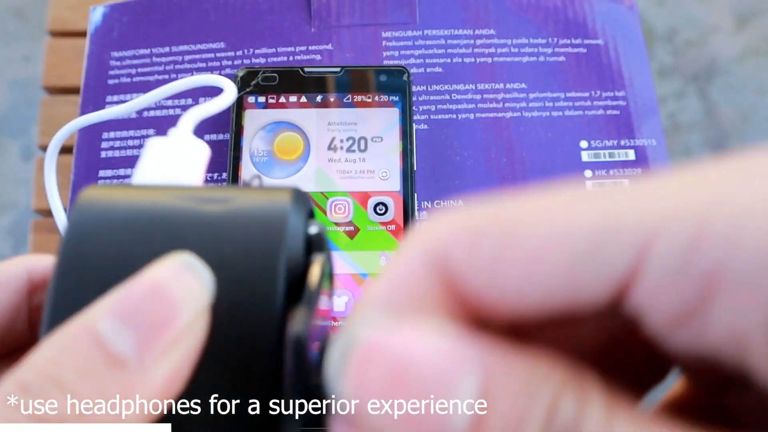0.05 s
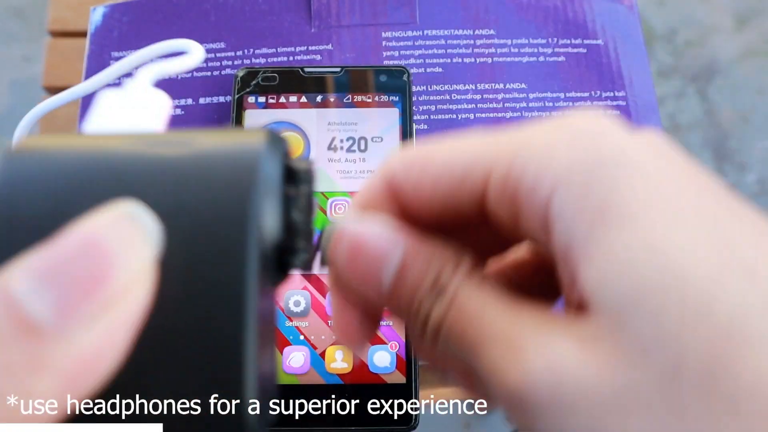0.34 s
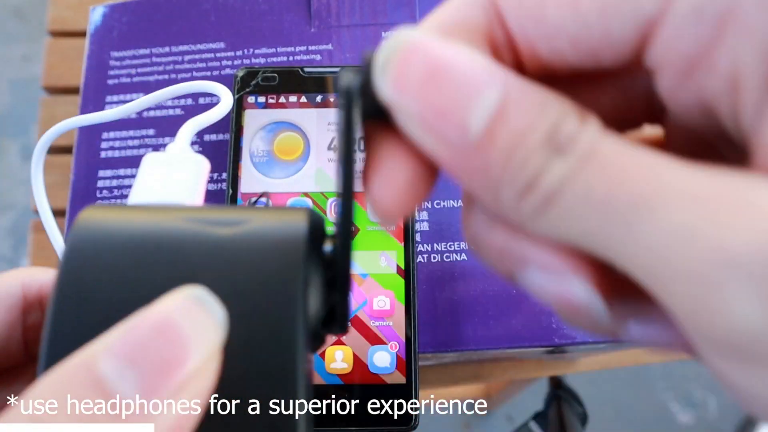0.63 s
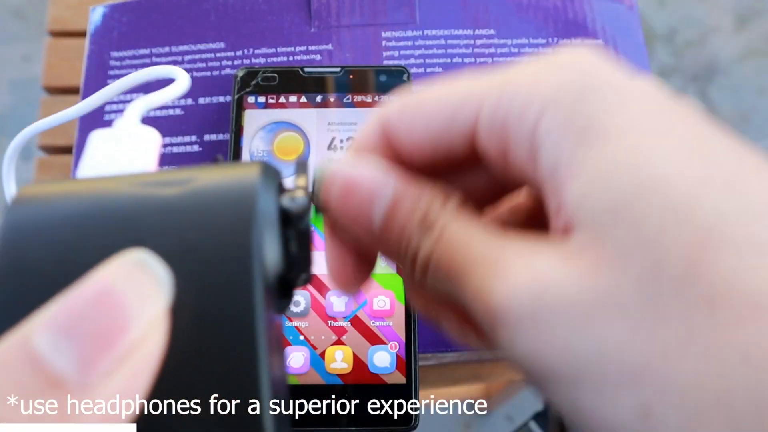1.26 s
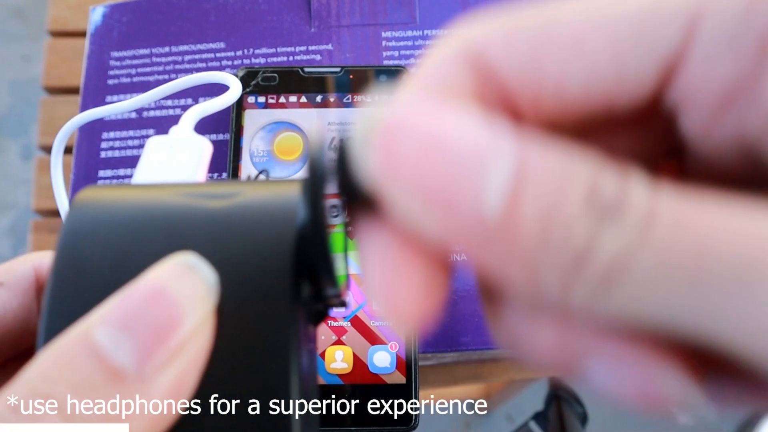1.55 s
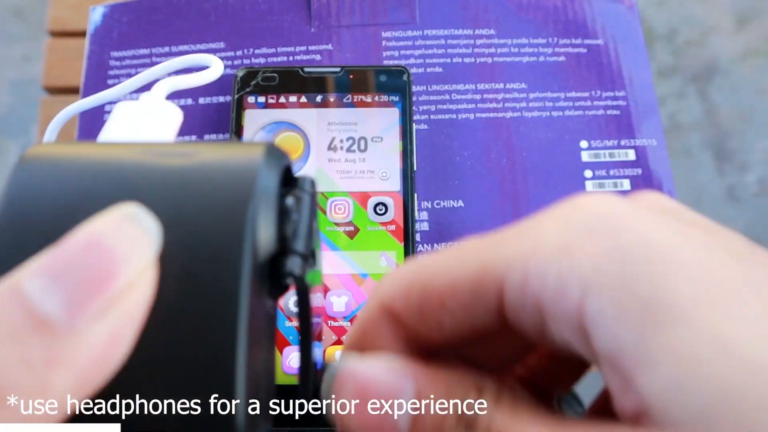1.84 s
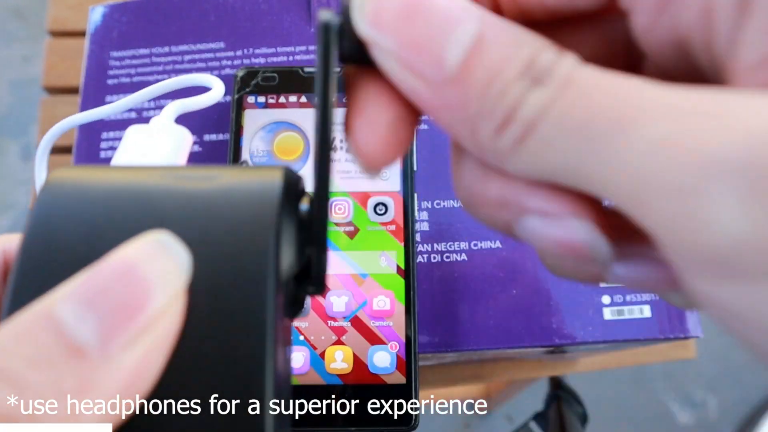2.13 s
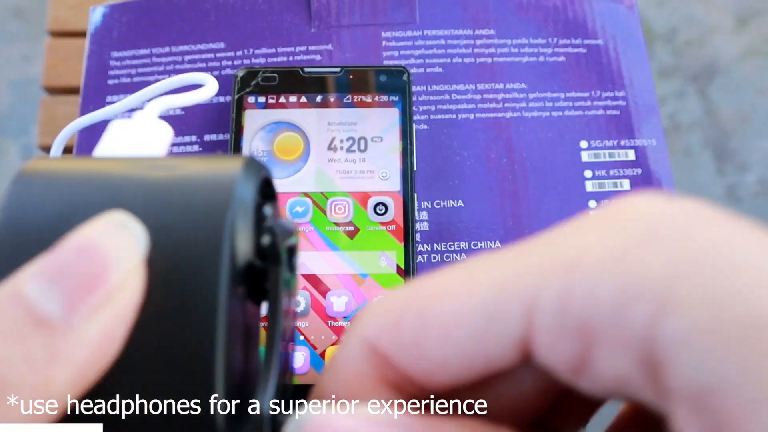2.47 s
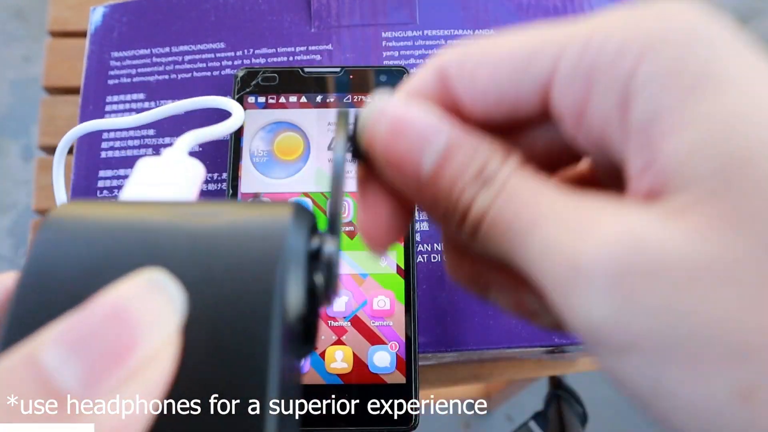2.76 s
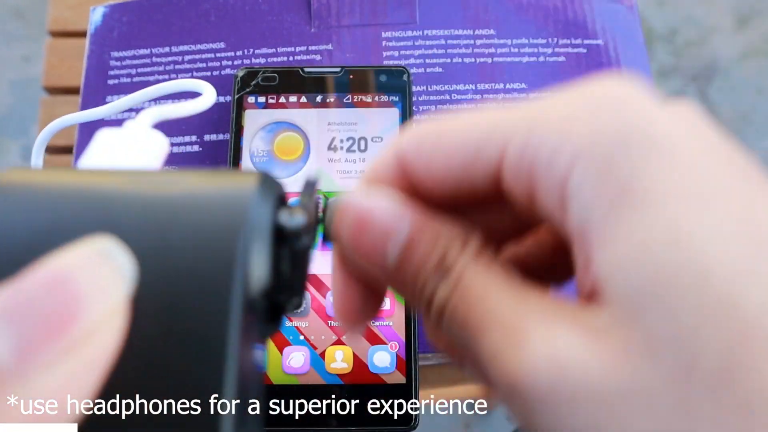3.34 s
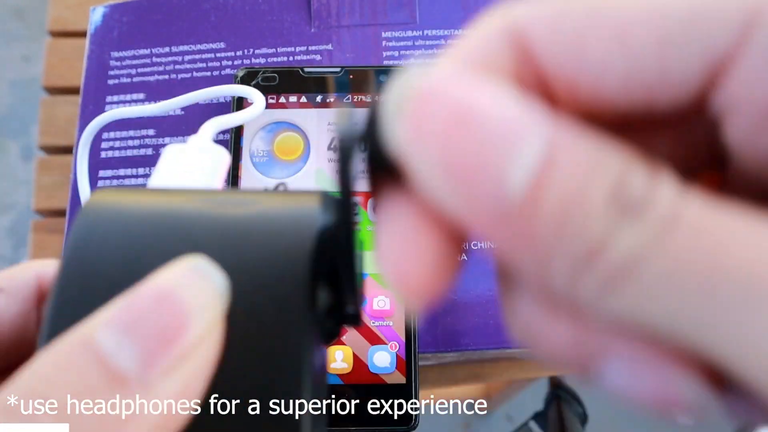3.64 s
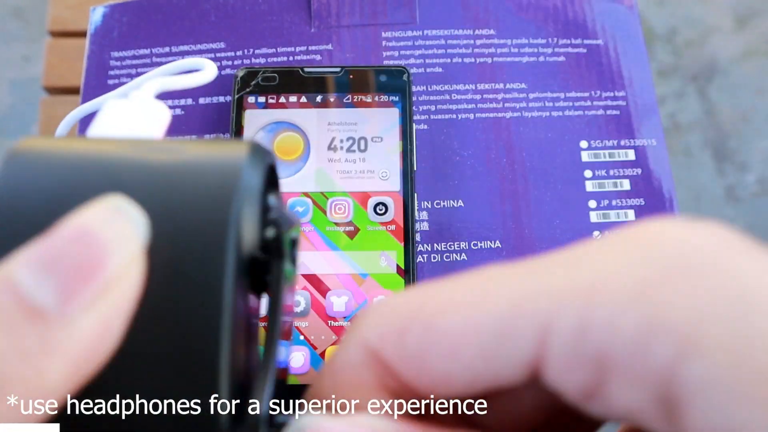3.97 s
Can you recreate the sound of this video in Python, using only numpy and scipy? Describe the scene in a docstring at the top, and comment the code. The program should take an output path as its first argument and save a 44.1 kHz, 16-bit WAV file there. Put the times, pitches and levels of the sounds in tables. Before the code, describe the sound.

A small hand crank winds close by, its plastic gears grinding and chattering without pause.

```python
"""Winding a hand-crank charger

A small charger is wound close by, a little under two turns a second. Each push speeds up the dynamo
and presses the plastic gears into a dense grind; between pushes the teeth run slack and chatter.
The gears make the hollow case ring, over a faint dynamo hum and a low outdoor rumble."""
import sys
import numpy as np
from scipy import signal
from scipy.fft import rfft, irfft
from scipy.io import wavfile
from scipy.ndimage import map_coordinates

SR = 44100
rng = np.random.default_rng(int(sys.argv[2]) if len(sys.argv) > 2 else 0)


def output_pcm(signal):
    """Save a mono or channel-first signal as 16-bit PCM at the path in sys.argv[1].

    Samples are clipped to [-1, 1] before scaling.
    """
    pcm = np.clip(np.atleast_2d(signal).T, -1, 1) * 32767
    wavfile.write(sys.argv[1], SR, np.round(pcm).astype(np.int16))


N = 176400

# How fast the dynamo spins. Each row: time in seconds, pitch of its hum in Hz.
SPEED = [(0, 355.2), (.28, 335.3), (.5, 401.3), (.66, 350), (.8, 342.6), (1.08, 434.9), (1.3, 356),
         (1.5, 328.1), (1.65, 438.9), (1.85, 376), (2.07, 339.9), (2.23, 438.4), (2.38, 361.5),
         (2.57, 329.9), (2.75, 385.1), (2.9, 384.6), (3.14, 339.9), (3.35, 408.4), (3.62, 372.3),
         (3.8, 388), (3.92, 435.3), (4, 409.3)]
# How hard the crank is pushed. Each row: time in seconds, relative level of the grind in dB.
EFFORT = [(0, -51), (.08, -41), (.125, -48.5), (.165, -51), (.2, -45), (.23, -46.5), (.28, -41),
          (.34, -45.5), (.38, -38.5), (.46, -41.5), (.53, -43.5), (.66, -46), (.74, -44), (.78, -44.5),
          (.87, -41.5), (.965, -43.5), (1.01, -41), (1.13, -42.5), (1.18, -48), (1.25, -45.5),
          (1.35, -48.5), (1.43, -46), (1.52, -42), (1.6, -37.5), (1.68, -44), (1.77, -48), (1.85, -42.5),
          (1.9, -46.5), (2.08, -45), (2.17, -39), (2.28, -43), (2.35, -47.5), (2.4, -43), (2.48, -45.5),
          (2.57, -45.5), (2.7, -42), (2.76, -43.5), (2.78, -38.5), (2.97, -42.5), (3.12, -46), (3.2, -42.5),
          (3.28, -40.5), (3.38, -41), (3.6, -43.5), (3.78, -42.5), (3.89, -37), (4, -41)]
# How loose the gears are. Each row: time in seconds, relative level of the chatter in dB.
LOOSENESS = [(0, -50), (.06, -48), (.15, -43), (.23, -52), (.29, -43), (.35, -42), (.51, -37.5),
             (.6, -36.5), (.66, -42.5), (.74, -39), (.8, -38.5), (.88, -33.5), (1.08, -38.5), (1.22, -36.5),
             (1.39, -40), (1.58, -37.5), (1.76, -36.5), (1.94, -38.5), (2.03, -39), (2.15, -36),
             (2.35, -37.5), (2.45, -37.5), (2.58, -40.5), (2.86, -36), (3.03, -36.5), (3.16, -39.5),
             (3.22, -42.5), (3.32, -35), (3.58, -35), (3.8, -35), (3.9, -35.5), (4, -36)]
POLES = 3  # hum cycles per turn of the rotor, the dynamo's spinning part
GEAR_RATIO = 8.5  # rotor turns per turn of the middle gear
CHATTER_DECAY_S = .0013


def undb(db):
    """Turn decibels into a gain to multiply by."""
    return 10 ** (np.asarray(db) / 20)


def unit(x):
    """Scale to an average power of 1."""
    return x / np.sqrt(np.mean(x ** 2))


def curve(rows):
    """Join (seconds, value) rows with straight lines."""
    return np.interp(np.arange(N) / SR, *np.array(rows).T)


def wander(rate):
    """A smooth random wobble through `rate` points a second."""
    points = rng.standard_normal(4096)
    return unit(map_coordinates(points, [np.arange(N) / SR * rate], mode="mirror"))


def freqs():
    """The frequencies in Hz at which filter gains are given."""
    return np.arange(N + 1) * SR / (2 * N) + 1


def resonance(hz, width_hz):
    """Gains that favour one pitch and fall steeply around it."""
    f = freqs()
    return 1 / (1 + ((f * f - hz * hz) / (f * width_hz)) ** 2)


def colour(x, gain):
    """Filter x by the shape of `gain`; white noise keeps its power."""
    cepstrum = irfft(np.log(unit(gain) + 1e-7))
    cepstrum[1:N] *= 2  # fold it so ringing comes after a hit, never before
    cepstrum[N + 1:] = 0
    return irfft(rfft(x, 2 * N) * np.exp(rfft(cepstrum)))[:N]


def background():
    """Outdoor air, a far drone and soft bumps from handling."""
    # Outdoor noise. Each row: frequency in Hz, relative level in dB.
    air = [(20, -9), (40, -13.5), (80, -11), (160, -18), (300, -18), (1000, -19), (8000, -50)]
    # The drone's tones. Each row: pitch in Hz, width in Hz, base level in dB.
    drone = [(55.5, 3.9, -73), (153.3, 10.5, -83)]
    # Its swells. Each row: time in seconds, level change in dB.
    swell = [(0, -0.5), (1.4, -2.5), (1.75, 5), (2.15, -1.5), (2.65, 2), (3.3, -4), (3.8, 2.5)]
    # Handling bumps. Each row: peak time in seconds, level in dB, spread in seconds, top in Hz.
    bumps = [(0.43, -61, 0.031, 50), (0.913, -50.5, 0.033, 65), (1.14, -59, 0.023, 55),
             (1.461, -56, 0.023, 62), (1.68, -66.5, 0.028, 330)]
    t, f = np.arange(N) / SR, freqs()
    hz, db = np.array(air).T
    air_gain = undb(np.interp(np.log(f), np.log(hz), db))
    out = undb(-69.5) * colour(rng.standard_normal(N), air_gain)
    for hz, width, db in drone:
        tone = unit(colour(rng.standard_normal(N), resonance(hz, width)))
        out += undb(db) * tone * undb(curve(swell))
    for s, db, spread, top_hz in bumps:
        thud = colour(rng.standard_normal(N), 1 / (1 + (f / top_hz) ** 4))
        out += undb(db) * np.exp(-((t - s) / spread) ** 2 / 2) * thud
    return out


def hum(rotor, waver_share=.011, flicker_db=2):
    """The dynamo's poles hum unsteadily, louder as it spins faster."""
    # The hum's strength. Each row: time in seconds, base level in dB.
    level = [(0, -87), (.6, -80), (1, -78.5), (2, -79), (2.9, -74.5), (4, -76.5)]
    speed = curve(SPEED)
    waver = np.cumsum(waver_share * speed * wander(50)) / SR
    tone = np.sin(2 * np.pi * (POLES * rotor + waver))
    return unit(tone * undb(flicker_db * wander(24.97)) * speed ** 1.5) * undb(curve(level))


def case(tilt_db, damping):
    """Gains of the hollow case, tilted by tilt_db per octave; damping widens its resonances."""
    # The case's resonances. Each row: pitch in Hz, base width in Hz, relative level in dB.
    modes = [(726, 222, -13), (1030, 355, -6), (1290, 463, -5.5), (1880, 620, -8.5), (2287, 440, -4),
             (2710, 190, -2), (2918, 270, -1.5), (3368, 163, 1.5), (3696, 530, -1), (4735, 1070, 0.5),
             (5780, 1290, -2.5), (7300, 370, -21), (9340, 370, -27), (10770, 940, -26.5),
             (12240, 2000, -28), (14650, 1500, -29)]
    f = freqs()
    power = sum((undb(db) * resonance(hz, width * damping)) ** 2 for hz, width, db in modes)
    power /= 1 + (590 / f) ** 4  # too small to give off bass
    return np.sqrt(power) * undb(tilt_db * np.log2(np.minimum(f, 6000)))


def snap(bright_hz=6900):
    """Gains of the case for a short, hard hit, with extra treble."""
    return case(tilt_db=2, damping=.9) * (1 + undb(5.5) / (1 + (bright_hz / freqs()) ** 8))


def contacts(steps, jitter, scatter_db):
    """One kick, uneven in time and strength, for each whole step of a rotation."""
    chance = rng.standard_normal((8000, 2))
    whole = np.arange(int(steps[-1]))
    at = np.interp(whole + jitter * chance[whole, 0], steps, np.arange(N)).astype(int)
    kicks = np.zeros(N)
    kicks[at] = undb(scatter_db * np.minimum(chance[whole, 1], 1))
    return kicks


def burst(kicks, decay_s, attack_s=.00035, tail_s=.0083):
    """Each kick sets off a crack of noise, with a faint longer tail from the case."""
    def fade(x, s):
        return signal.lfilter([1], [1, -np.exp(-2 / (s * SR))], x + 1e-18)
    push = fade(kicks ** 2, attack_s) * (1 - np.exp(-2 / (attack_s * SR)))
    tail = undb(-6.5) ** 2 * decay_s / tail_s * fade(push, tail_s)
    return np.sqrt(fade(push, decay_s) + tail) * rng.standard_normal(len(kicks))


def load(middle_db=-42, span_db=7):
    """How hard the teeth press together, from 0 to 1."""
    return (1 + np.tanh((curve(EFFORT) - middle_db) / span_db)) / 2


def slips(dip_db=-8):
    """A gain that dips when the teeth briefly lose contact."""
    # Gaps in contact. Each row: middle time in seconds, length in seconds.
    gaps = [(0.116, 0.0091), (.161, .008), (0.177, .007), (0.236, 0.007), (.613, 0.0049), (0.628, 0.0042),
            (.695, 0.0041), (0.718, 0.0055), (0.741, 0.017), (1.205, 0.005), (1.337, 0.01), (1.389, 0.0088),
            (1.896, 0.0046), (2.355, 0.011), (2.494, 0.0075), (3.003, .005), (3.058, 0.011),
            (3.138, 0.0067)]
    t = np.arange(N) / SR
    return undb(sum(dip_db * np.exp(-(2 * (t - s) / length) ** 4) for s, length in gaps))


def whirr(rotor):
    """A rough ring from the gears; its pitch rises a little with speed."""
    drive = burst(contacts(2 * rotor, jitter=.19, scatter_db=.5), CHATTER_DECAY_S)
    ring = unit(colour(drive, resonance(hz=2835, width_hz=340)))
    speed = curve(SPEED)
    pitch_ratio = (speed / speed.mean()) ** .12
    bent = map_coordinates(ring, [np.cumsum(pitch_ratio)], mode="mirror")
    return bent * undb(curve(LOOSENESS) - 9.5)


def ticks(rotor):
    """Sharp little tooth ticks, louder when the gears are loose."""
    kicks = contacts(1.1 * rotor, jitter=.22, scatter_db=13.5)
    cracks = unit(burst(kicks, decay_s=.00035))
    return colour(cracks, snap()) * undb(curve(LOOSENESS) - 11)


def rasps(rotor, width_hz=410):
    """A rubbing wheel makes one pitch ring for a moment, pulsing with the rotor."""
    # Rubs. Each row: middle time in seconds, length in seconds, pitch in Hz, level in dB.
    rubs = [(0.077, 0.095, 6060, -40.5), (.09, 0.12, 3400, -44.5), (0.547, 0.09, 2680, -46),
            (0.924, 0.074, 6900, -45), (0.94, 0.022, 2900, -37), (1.01, 0.18, 6180, -45.5),
            (1.846, 0.057, 4850, -37.5), (2.068, .1, 2860, -41.5), (2.512, 0.038, 6050, -37),
            (2.674, .1, 2850, -40), (2.716, .1, 6050, -44), (2.83, 0.076, 6670, -47),
            (2.913, .14, 4900, -40), (3.06, 0.055, 5900, -37.5), (3.147, 0.069, 2850, -41.5),
            (3.26, 0.054, 2780, -37), (3.495, 0.18, 4900, -37.5), (3.667, 0.11, 5990, -37.5),
            (3.723, 0.1, 4580, -38), (3.714, 0.096, 2940, -39.5), (3.884, 0.14, 2920, -36),
            (3.882, 0.12, 3400, -36.5)]
    t, out = np.arange(N) / SR, np.zeros(N)
    scrape = unit(burst(contacts(rotor, jitter=.15, scatter_db=2), decay_s=.0039))
    for s, length, hz, db in rubs:
        band = signal.butter(2, [hz - width_hz / 2, hz + width_hz / 2], "bandpass", fs=SR, output="sos")
        ring = unit(signal.sosfilt(band, scrape))
        out += ring * undb(db) * np.exp(-2 * ((t - s) / length) ** 2)
    return out


def clacks(bounce_s=.0046, rise_s=.00061, width_hz=1600):
    """The gears knock across their gaps and bounce: crisp when slack, duller when pressed."""
    # Knocks. Each row: start in seconds, peak level in dB, ringing pitch in Hz.
    knocks = [(0.06, -23.5, 3400), (.079, -23.5, 3500), (0.124, -24.5, 5500), (0.1392, -24, 5800),
              (.1665, -27, 5800), (0.1853, -21, 3720), (0.1954, -28, 6000), (.5075, -20, 4870),
              (0.6308, -19, 5600), (.6995, -18, 4530), (.7237, -24.5, 4720), (0.7302, -26, 5500),
              (0.75, -24, 5020), (.769, -22, 5000), (1.152, -21, 5500), (1.207, -21, 5140),
              (1.22, -26, 5500), (1.34, -23, 5400), (1.421, -24, 5660), (1.4248, -29, 5660),
              (1.476, -21, 5000), (1.581, -17.5, 5700), (1.6803, -22.5, 5576), (1.86, -18, 4730),
              (1.9236, -20.5, 4860), (1.9495, -24.5, 4930), (1.9688, -32, 4540), (1.9758, -22.5, 4600),
              (2.28, -23, 5925), (2.369, -22, 5070), (2.381, -18.5, 5070), (2.5075, -17, 5970),
              (2.5272, -23, 5600), (3.061, -23, 5900), (3.082, -30, 5600), (3.087, -31, 5900),
              (3.1132, -21, 5370), (3.144, -20, 4940), (3.163, -21, 5500), (3.5018, -19.5, 4900),
              (3.6284, -19.5, 5830), (3.887, -18, 4900), (3.9706, -20, 5540)]
    out, kicks, pressed = np.zeros(N + SR), np.zeros(SR // 20), load()
    kicks[0], kicks[int(bounce_s * SR)] = 1, undb(-18)
    crisp = colour(signal.unit_impulse(N), snap())[:len(kicks)]
    dull = colour(signal.unit_impulse(N), case(tilt_db=0, damping=1))[:len(kicks)]
    rise = 1 - np.exp(-np.arange(len(kicks)) / SR / rise_s)
    for s, db, hz in knocks:
        start = int(s * SR)
        crack = burst(kicks, decay_s=.00082) * rise
        ring = signal.lfilter(*signal.iirpeak(hz, hz / width_hz, fs=SR), crack)
        knock = signal.fftconvolve(ring + crack, crisp + pressed[start] * (dull - crisp))
        out[start:start + len(knock)] += undb(db) * knock / np.abs(knock).max()
    return out[:N]


def chatter(rotor):
    """Loose teeth tap about twice a rotor turn, each tap stirring the case differently."""
    throb_db = .7 * np.sin(2 * np.pi * rotor / GEAR_RATIO) + 1.5 * np.cos(2 * np.pi * rotor)
    kicks = contacts(2 * rotor, jitter=.22, scatter_db=5.5) * undb(throb_db)
    body, f, out = case(tilt_db=4, damping=.92), freqs(), np.zeros(N)
    for low_hz, high_hz in [(100, 2500), (2500, 4100), (4100, 5300), (5300, 13400)]:
        band = body * np.where((f > low_hz) & (f < high_hz), 1, .1)
        if low_hz < 1000:
            band *= undb(-2.5)  # light taps stir the low resonances less
        flicker_db = 4 * np.tanh(wander(200))
        cracks = unit(burst(kicks * undb(flicker_db), CHATTER_DECAY_S))
        out += colour(cracks, band) * np.linalg.norm(band)
    return unit(out) * undb(curve(LOOSENESS) - 3)


def grind(rotor, teeth=9):
    """Pressed teeth scrape in quick succession; off-centre wheels make them throb."""
    throb_db = 4 * np.cos(2 * np.pi * rotor) + .5 * np.sin(2 * np.pi * rotor / GEAR_RATIO)
    kicks = contacts(rotor * teeth, jitter=.3, scatter_db=2) * undb(throb_db + wander(70))
    scrape = unit(burst(kicks, decay_s=.00062)) * undb(curve(EFFORT) + 6.5)
    light = colour(scrape, case(tilt_db=-2.04, damping=.92))
    hard = colour(scrape, case(tilt_db=-2.04, damping=1.29))  # a hard push damps the case
    return light + load() * (hard - light)


def scene():
    """One spinning rotor drives the gears and the hum, over the background."""
    rotor = np.cumsum(curve(SPEED) * (1 + .006 * wander(30))) / POLES / SR  # turns so far
    effort = curve(EFFORT)
    slack = np.clip((effort.max() - effort) / 10, 0, 1)
    flicker = undb(2.5 * slack * np.minimum(wander(120), .5))  # slack gears lose touch for instants
    teeth = grind(rotor) + chatter(rotor) + rasps(rotor) + ticks(rotor) + whirr(rotor)
    gears = teeth * flicker * slips() + clacks()
    return (gears + hum(rotor) + background())[None]


def record(dry):
    """Cut the treble above 15750 Hz."""
    return signal.sosfilt(signal.ellip(10, .1, 70, 15750, fs=SR, output="sos"), dry)


dry = scene()
out = record(dry)
output_pcm(out)
```